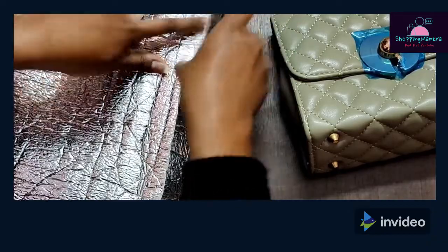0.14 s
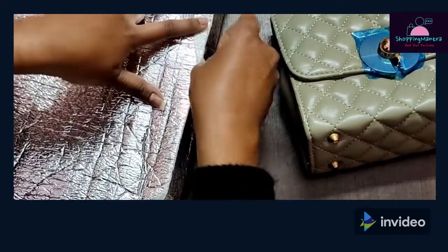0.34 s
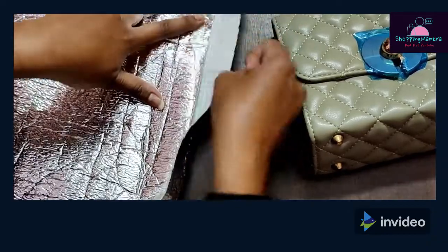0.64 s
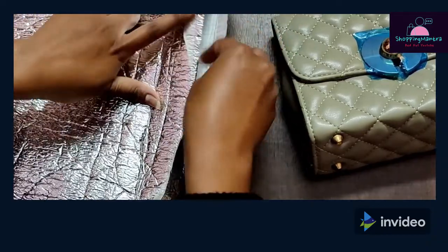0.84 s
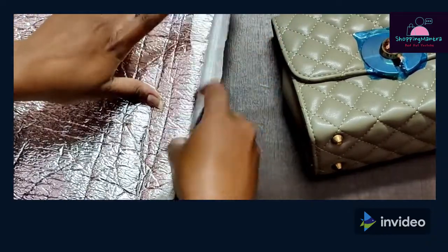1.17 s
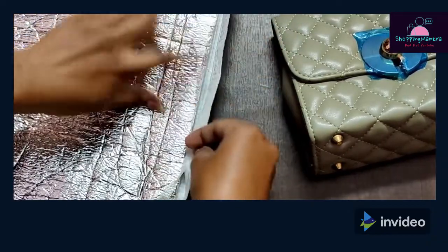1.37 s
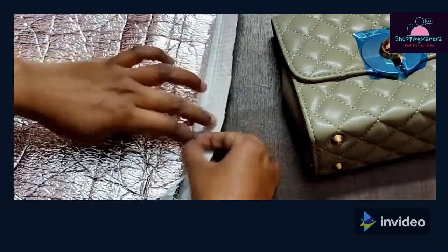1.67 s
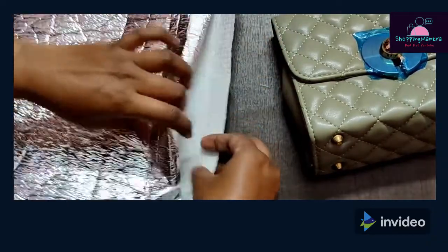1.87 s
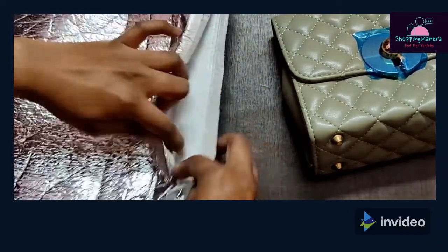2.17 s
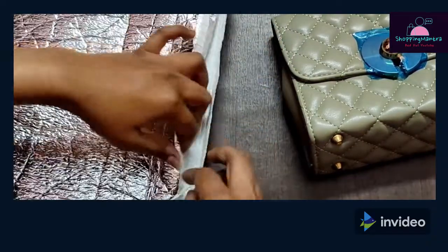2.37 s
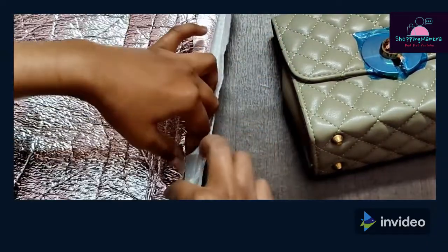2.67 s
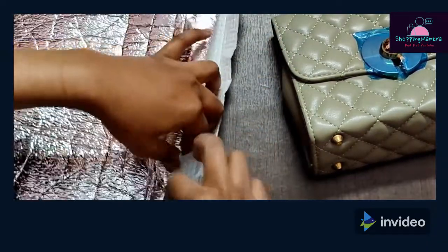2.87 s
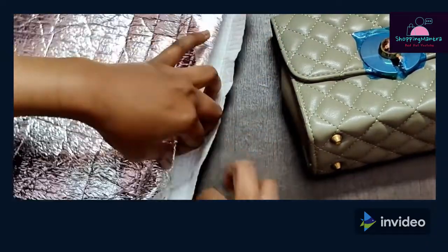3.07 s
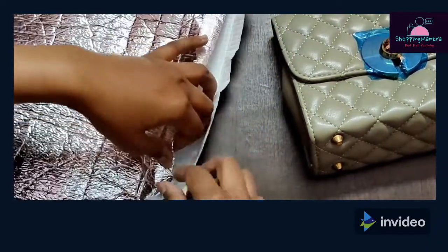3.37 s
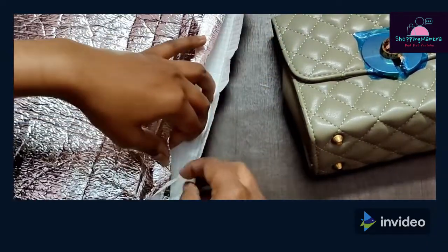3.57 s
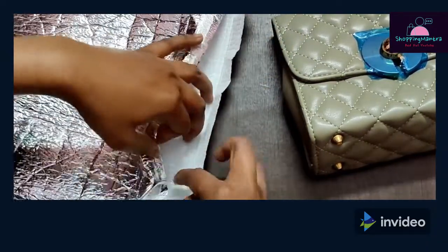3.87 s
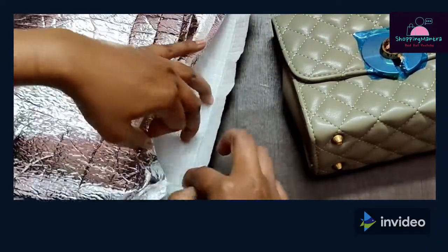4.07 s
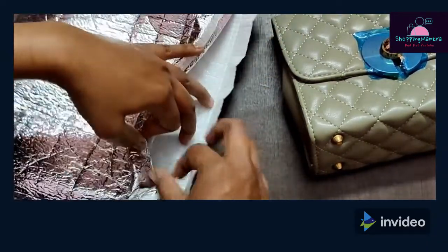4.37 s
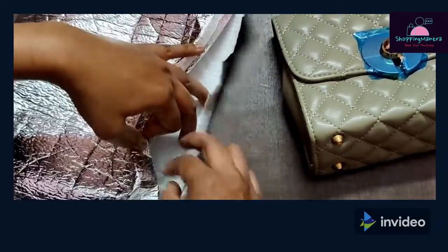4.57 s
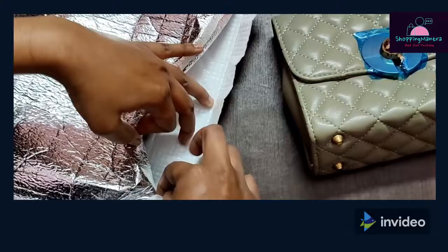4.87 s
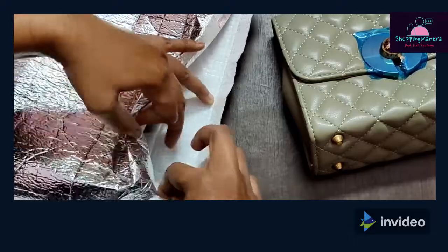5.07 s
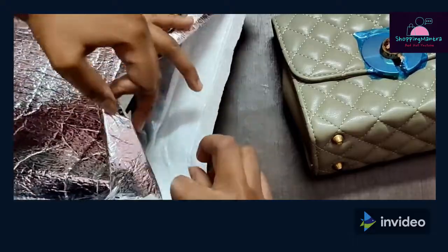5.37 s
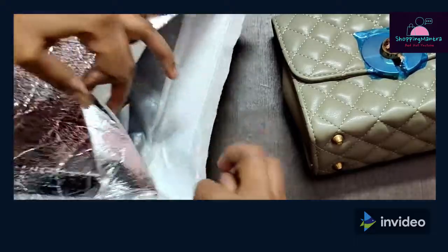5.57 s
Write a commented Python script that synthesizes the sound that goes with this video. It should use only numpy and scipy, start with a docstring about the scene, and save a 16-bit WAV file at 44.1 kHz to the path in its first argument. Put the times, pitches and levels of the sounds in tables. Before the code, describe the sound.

Foil-lined plastic wrapping is opened on a table, heard close and centred with a short indoor reverberation. Crisp opening snaps give way to quiet rustle, then a strong cluster of crackles. Scattered ticks and a low bump come midway; heavier snaps with padded knocks and busier crinkling close it, over faint low rumble.

```python
"""Opening of a foil-lined parcel

Hands pull open a foil-lined plastic parcel on a table in a small room, close to one microphone.
Buckling creases excite short noise bursts and damped modes of the foil, the plastic and the padding.
Between the snaps, clumped grains of coloured noise over a steady hiss make the film crinkle and slide.
Damped sines add low thumps, knocks and rings; echoes, a diffuse tail and quiet room air surround it all."""
import sys
import numpy as np
from scipy import signal
from scipy.fft import rfft, irfft
from scipy.io import wavfile
from scipy.ndimage import uniform_filter1d

SR = 44100
rng = np.random.default_rng(int(sys.argv[2]) if len(sys.argv) > 2 else 0)


def to_wav(s):
    """Save 16-bit WAV."""
    ch = np.atleast_2d(s).T  # columns
    pcm = np.round(np.clip(ch, -1, 1) * 32767)  # PCM
    wavfile.write(sys.argv[1], SR, pcm.astype(np.int16))


N = 253134  # length in samples

# Creases that stand out; levels are relative energies, as rms over 1 ms:
# [t/s, crack level/dB, crack brightness/dB, pop level/dB, pop f/Hz, thump level/dB]
CREASES = [(.036, -18, -4, -25.5, 1820, -32.5), (0.0388, -12.5, -10, -16.5, 1730, -46),
           (0.044, -20.5, -3, -27, 2030, -41), (0.324, -23, 5, -37, 1860, -61),
           (0.3588, -31, 1, -32.5, 1810, -75), (0.518, -42.5, -10, -55, 1720, -76),
           (0.5457, -51, -14, -46, 1720, -59), (.6734, -18, -16, -16.5, 2054, -35),
           (0.6876, -18, 2, -23, 2060, -38), (0.6971, -15, 3, -12.5, 1820, -28),
           (.7, -18, 8, -11.5, 1750, -36), (0.7039, -18, -1, -15, 2200, -40),
           (.7155, -15.5, 3, -17, 2020, -42.5), (0.721, -21, -5.5, -16, 1824, -42.5),
           (.865, -42, -4, -43, 1460, -56), (.91, -36.5, 8, -56, 2000, -71),
           (1.0544, -41, -18, -35, 1470, -48.5), (1.2496, -35.5, -4, -31, 1570, -60),
           (1.2647, -20.5, 9, -16, 1420, -39), (1.2825, -30, -11, -33, 1900, -30.5),
           (1.2956, -19.5, 8, -24, 1860, -48), (1.4419, -37.5, -10, -47, 1970, -53.5),
           (1.455, -42, 11, -41.5, 1680, -54), (1.518, -36, 5, -40, 1820, -65),
           (1.582, -28.5, 12, -26, 1910, -47), (1.5966, -21, -3, -29, 1740, -42.5),
           (1.8035, -34.5, 4, -40.5, 2930, -61), (1.8531, -23.5, 8, -31.5, 3040, -52),
           (1.8698, -37.5, 0, -37.5, 1650, -48), (1.925, -30, 27, -38, 1980, -47),
           (1.9571, -33, 16, -42, 1500, -44.5), (1.976, -31, 22, -53, 1770, -52),
           (2.0297, -34, -3, -32.5, 1840, -57), (2.3515, -21.5, -17, -24, 2250, -42),
           (2.356, -20, 3.5, -27, 2440, -42), (2.421, -31.5, -9, -31, 1940, -42),
           (2.4744, -36, 11, -50, 1700, -69), (2.6127, -49, -12, -42, 1530, -68),
           (2.9375, -37, 7, -35.5, 1350, -56), (2.958, -34.5, -1, -45, 1710, -65),
           (2.9828, -41, 13, -46, 1390, -65), (2.9977, -29, 1.5, -19, 1740, -36),
           (3.068, -32, -17, -61, 1790, -54), (3.1393, -34, 3.5, -43, 1934, -47),
           (3.6133, -33, 2, -25.5, 2020, -35.5), (3.798, -40, 10, -60, 2000, -66),
           (3.8673, -27, 9, -39, 1690, -61), (3.9322, -22.5, 4.5, -33.5, 2430, -58),
           (3.9839, -37, -2, -40.5, 1890, -58), (4.0219, -35, 7, -34, 1150, -31),
           (4.2433, -18, -10, -20.5, 2050, -21), (4.2672, -16.5, 1.5, -17.5, 1950, -19),
           (4.4542, -49, -17, -43, 1800, -44), (4.6915, -28, -5, -26, 1780, -26),
           (4.845, -69, 5, -46.5, 1700, -44), (4.9993, -54, -1, -51, 1820, -72),
           (5.097, -23.5, -6.5, -17.5, 1740, -18.5), (5.2952, -33.5, 1, -30.5, 2090, -37),
           (5.325, -32.5, 0, -30.5, 1900, -32.5), (5.3568, -26, -11, -28.5, 2730, -29),
           (5.3958, -33.5, -9, -31, 1400, -28), (5.54, -32, -15, -42, 2180, -56),
           (5.589, -42, -8, -41, 1920, -37.5), (5.6431, -29, 1, -30.5, 1780, -27),
           (5.6504, -32, -17, -37.5, 1710, -35), (5.7077, -41, -9, -47, 1560, -49)]
# Low thumps and knocks, short rings of the sheet and one faint lingering ring, one damped mode each:
# [t/s, energy level/dB, f/Hz, decay time/s]
KNOCKS_AND_RINGS = [(0.038, -35.5, 295, 0.0052), (0.361, -49, 1062, .34), (0.699, -16, 1700, 0.0049),
                    (0.713, -29, 202, 0.0065), (1.255, -35, 315, 0.0024), (1.265, -19, 1244, 0.0017),
                    (2.419, -29.5, 310, 0.0042), (2.999, -28, 300, 0.002), (3.132, -29.5, 266, 0.0041),
                    (3.336, -32, 93, 0.0071), (3.352, -25.5, 33.4, 0.028), (3.614, -34.5, 276, 0.00294),
                    (3.807, -37, 159, 0.0026), (4.019, -25.5, 330, 0.0025), (4.243, -20, 357, 0.0014),
                    (4.692, -30, 338, 0.0026), (5.098, -23.5, 927, 0.018), (5.601, -37.5, 65, 0.019)]
# Relative spectra of the three parts of the wrapping: [f/Hz, level per Hz/dB]
FOIL_SPECTRUM = [(700, -30), (2000, -7), (2900, -16.5), (3900, -11.5), (5000, -2.5), (6500, 5), (7600, 1.5),
                 (8500, -4), (10000, -2), (12000, -4), (13700, -0.5), (15500, -8.5), (17000, -9)]
PLASTIC_SPECTRUM = [(300, -55), (700, -8), (1100, 0.5), (1600, 1), (2300, -2.5), (3300, -8.5),
                    (5000, -14.5), (9000, -53)]
PADDING_SPECTRUM = [(100, -33.5), (190, -3.5), (280, 5.5), (500, -5), (800, -0.5), (1300, -6),
                    (3000, -51.5)]
# Pulls and slides of the fingers, with relative levels:
# [start t/s, length t/s, foil crinkle level/dB, plastic flexing level/dB, padding shift level/dB]
FINGER_STROKES = [(-.02, 0.044, -36, -37.5, -51.5), (0.03, 0.047, -39, -54, -66),
                  (0.155, 0.11, -52.5, -52, -63.5), (0.237, 0.16, -54, -54.5, -61.5),
                  (0.623, 0.042, -60.5, -54.5, -75), (0.66, 0.053, -27.5, -27.5, -43.5),
                  (0.787, 0.078, -48.5, -48.5, -62.5), (0.897, .12, -60, -62, -91),
                  (1.024, 0.12, -63.5, -61, -63), (1.2, 0.066, -57, -62, -67),
                  (1.288, .045, -44.5, -50, -50), (1.42, .13, -61, -61, -75),
                  (1.594, 0.018, -39.5, -39.5, -52.5), (1.668, 0.073, -55.5, -58, -72),
                  (1.847, .12, -55.5, -50, -71), (1.987, 0.11, -49.5, -51, -61),
                  (2.134, 0.3, -53, -54, -64), (2.402, 0.084, -54.5, -50, -53),
                  (2.623, 0.076, -67.5, -59.5, -59.5), (2.775, 0.13, -62.5, -62, -91),
                  (3.046, 0.13, -58.5, -54.5, -64), (3.28, 0.037, -80, -67, -79.5),
                  (3.68, .18, -64, -64.5, -69), (3.88, 0.13, -58, -58.5, -58.5),
                  (4.02, 0.22, -55.5, -55, -55.5), (4.216, 0.092, -58, -63, -51),
                  (4.432, 0.12, -61, -56, -53), (4.676, 0.016, -46.5, -49.5, -43),
                  (4.737, 0.034, -70, -58.5, -46), (4.844, 0.086, -64, -59, -63.5),
                  (4.969, 0.11, -63.5, -62, -59.5), (5.1, .075, -79, -70, -44),
                  (5.225, 0.13, -54, -53.5, -51), (5.335, 0.09, -45.5, -47, -39.5),
                  (5.443, 0.32, -57.5, -58.5, -59.5), (5.622, 0.055, -57.5, -58.5, -45.5)]
# Stir under the resting hand: [foil level/dB, plastic level/dB, padding level/dB]
REST_LEVELS = (-77, -80, -76)
# Treble gain, higher where the foil is pulled taut: [t/s, lift level/dB]
FOIL_TENSION = [(0, 8), (.2, -8), (.7, 0), (1.1, -12), (1.3, -6), (1.95, -1.5), (2.25, -2), (2.999, 1),
                (3.65, -5), (4.101, -3), (4.27, 4), (4.6, -8), (4.9, 10.5), (5.1, 5.5), (5.4, 1.5),
                (5.74, 4.5)]
# Reverberation time of the room: [f/Hz, time to fall by 60 dB t/s]
REVERB_TIME = [(150, 0.55), (330, 0.36), (600, 0.32), (1500, 0.27), (4000, 0.36), (9000, 0.23),
               (16000, 0.26)]
# Early reflections off the table and near walls: [delay t/s, gain as a factor]
REFLECTIONS = [(.0052, 0.029), (.0095, 0.063), (0.0158, 0.088), (0.0225, -0.086), (0.031, 0.042)]
# Relative spectrum of the quiet room: [f/Hz, level per Hz/dB]
AIR_SPECTRUM = [(15, 0), (30, -13), (55, 8.5), (104, 1.5), (134, -2.5), (216, -16), (400, -23.5),
                (700, -29), (1700, -27.5), (3200, -34), (6500, -27.5), (8650, -38.5), (13500, -31.5),
                (16000, -38.5)]

AIR_DB = -55.5  # rms level of the room air
BAND_EDGE_HZ = 16150
ATTACK_S, RELEASE_S = 0.012, 0.025  # a stroke takes hold, keeps its level, then dies away
THUMP_HZ, THUMP_SCATTER = 525, 0.17  # pitch of the padded sheet, and its spread between snaps as a share


def amp(db):
    """Level: decibels to an amplitude factor."""
    return 10 ** (np.asarray(db) / 20)


def evened(x):
    """Normalisation: scales to rms 1."""
    return x / np.sqrt(np.mean(x ** 2) + 1e-20)


def one_ms(x):
    """Energy normalisation: scales to the energy of one millisecond at rms 1."""
    return x / np.sqrt(np.sum(x ** 2) * 1000 / SR + 1e-20)


def read(points, hz):
    """Interpolation: reads a table on a log-frequency axis."""
    f, value = np.transpose(points)
    return np.interp(np.log(hz + 1), np.log(f + 1), value)


def add(mix, s, sound):
    """Superposition: mixes a sound in at time s."""
    part = mix[max(round(s * SR), 0):][:len(sound)]
    part += sound[:len(part)]


def colour(x, spectrum, size=2048):
    """Minimum phase: a causal filter with the given spectrum keeps the sharp front of a click."""
    log_gain = np.log(amp(read(spectrum, abs(np.fft.fftfreq(size, 1 / SR)))))
    taps = np.fft.ifft(np.exp(signal.hilbert(log_gain).conj())).real
    return signal.fftconvolve(x, taps[:size // 2])[:len(x)]


def swell(t, decay):
    """Damping: an envelope with a rounded start and an exponential fall."""
    return np.exp(-t / decay) * (1 - np.exp(-1.5 * t / decay)) ** 2


def ring(t, hz, decay):
    """Modal vibration: one damped sine."""
    return swell(t, decay) * np.sin(2 * np.pi * hz * t)


def snaps(creases, crack_s=0.00055, creak_s=0.0018, creak_db=-19, shiver_db=-23, shiver_s=0.0041,
          pop_cycles=0.8, pop_rough=0.83, pop_rough_s=0.0009,
          thump_cycles=0.81, thump_rough=0.75, thump_rough_s=0.0027, thump_db=1.5):
    """Buckling: a crease flips, the foil cracks, the facet beside it pops and the padded sheet thumps."""
    out = np.zeros(N)
    t = np.arange(1280) / SR
    # neighbouring wrinkles shiver on for a few milliseconds
    shiver = amp(shiver_db) * swell(t, shiver_s)
    for s, crack_level, bright_db, pop_level, pop_hz, thump_level in creases:
        thump_hz = THUMP_HZ * np.exp(THUMP_SCATTER * rng.standard_normal())
        crack_noise, pop_noise, thump_noise, creak_noise = rng.standard_normal((4, len(t)))

        # a tighter crease cracks brighter
        tilt = [(7000, 0), (13000, bright_db + 2.5)]
        foil = [(hz, db + read(tilt, hz)) for hz, db in FOIL_SPECTRUM]
        crack = colour(crack_noise * (swell(t, crack_s) + shiver), foil)

        # each ring is one main mode among many irregular ones
        pop_mode = one_ms(ring(t, pop_hz, pop_cycles / pop_hz))
        pop_modes = one_ms(colour(pop_noise * (swell(t, pop_rough_s) + shiver), PLASTIC_SPECTRUM))
        pop = pop_mode + pop_rough * pop_modes
        thump_mode = one_ms(ring(t, thump_hz, thump_cycles / thump_hz))
        thump_modes = one_ms(colour(thump_noise * swell(t, thump_rough_s), PADDING_SPECTRUM))
        thump = thump_mode + thump_rough * thump_modes

        add(out, s, amp(crack_level) * one_ms(crack))
        add(out, s, amp(pop_level) * one_ms(pop))
        add(out, s, -amp(thump_level + thump_db) * one_ms(thump))  # opposite polarity

        # the crease creaks more and more as it is loaded, just before it gives
        strain = (creak_noise * np.exp(-t / creak_s))[:len(t) // 2][::-1]
        creak = amp(crack_level) * one_ms(colour(strain, foil))
        creak += amp(pop_level) * one_ms(colour(strain, PLASTIC_SPECTRUM))
        add(out, s - len(creak) / SR, amp(creak_db) * creak)
    return out


def small_snaps(motion, count=90, above_db=8, spread_db=1.0, ceiling_db=-38,
                bright_db=-3, bright_spread_db=6, pop_hz=1750, pop_spread=0.42):
    """Random buckling: one lesser crease per equal time slot, its level following the motion up to a ceiling."""
    rows = []
    for k, (when, *chance) in enumerate(zip(rng.random(count), *rng.standard_normal((5, count)))):
        at = int((k + when) * (N - 1) / count)
        levels = 20 * np.log10(motion[:, at]) + above_db + spread_db * np.array(chance[:3])
        crack, pop, thump = np.minimum(levels, ceiling_db)
        bright = bright_db + bright_spread_db * chance[3]
        rows.append((at / SR, crack, bright, pop, pop_hz * np.exp(pop_spread * chance[4]), thump))
    return rows


def handling():
    """Power addition: strokes of equal attack and release set the amplitude of foil, plastic and padding."""
    t = np.arange(N) / SR
    power = np.outer(amp(REST_LEVELS) ** 2, np.ones(N))
    for start, length, *levels in FINGER_STROKES:
        attack = np.clip((t - start) / ATTACK_S, 0, 1)
        release = np.exp(-np.clip(t - start - length, 0, 1) / RELEASE_S)
        power += np.outer(amp(levels) ** 2, (attack * release) ** 2)
    return np.sqrt(power)


def crinkle(motion, per_s=520, clump_db=4, spread_db=5, tick_s=0.0012, flex_s=0.00087, shift_s=0.0027,
            padding_db=-2.5):
    """Stick and slip: wrinkles give way in clumps over the hiss of sliding film, exciting all three parts."""
    t = np.arange(N) / SR
    slide = .36  # smooth sliding is weaker than the ticks
    # one wrinkle sets off its neighbours, so the rate comes and goes
    clumps = amp(clump_db * evened(uniform_filter1d(rng.standard_normal(N), size=600)))
    sizes = amp(spread_db * np.minimum(rng.exponential(1, N), 3))
    ticks = sizes * (rng.random(N) < clumps * per_s / SR)
    parts = ((FOIL_SPECTRUM, tick_s, 0), (PLASTIC_SPECTRUM, flex_s, 0), (PADDING_SPECTRUM, shift_s, padding_db))
    out = np.zeros(N)
    for level, (spectrum, decay, db) in zip(motion, parts):
        share = rng.uniform(0.11, 1, N)  # no two wrinkles shake the parts alike
        power = signal.fftconvolve((ticks * share) ** 2, swell(t[:1024], decay) ** 2)[:N]
        envelope = np.hypot(evened(np.sqrt(abs(power))), slide)
        grains = rng.standard_normal(N) * envelope
        out += level * amp(db) * evened(colour(grains, spectrum))
    return out


def wander(x, patchy_db=3.5):
    """Time-varying resonance: the sheet keeps changing shape, so its resonances come and go."""
    z = signal.stft(x, nperseg=256)[2]
    patches = uniform_filter1d(rng.standard_normal(z.shape), size=4, axis=0)  # across frequency
    patches = uniform_filter1d(patches, size=12, axis=1)  # across time
    gain = evened(amp(patchy_db * evened(patches)))
    return signal.istft(z * gain, nperseg=256)[1][:N]


def stretch(x, edge_hz=11500):
    """Tension: a tauter foil lifts the top of its spectrum."""
    highpass = 1 / (1 + (edge_hz / (np.fft.rfftfreq(N, 1 / SR) + 1)) ** 12)
    top = irfft(rfft(x) * highpass, N)
    lift = amp(np.interp(np.arange(N) / SR, *np.transpose(FOIL_TENSION)))
    return x + top * (lift - 1)


def knocks_and_rings(wet_db=-1):
    """Modal response: each thump, knock or ring is one damped mode, with the room's answer added."""
    out = np.zeros(N)
    t = np.arange(SR) / SR
    for s, db, hz, decay in KNOCKS_AND_RINGS:
        add(out, s, amp(db) * one_ms(ring(t, hz, decay)))
    return out + amp(wet_db) * room([out])


def room(sides, wet_db=-9.0, build_s=0.0086, treble_db=-1):
    """Reverberation: early echoes, and a diffuse tail of its own for each side, fading by frequency."""
    wet = np.zeros(N)
    for x in sides:
        hz, t, z = signal.stft(rng.standard_normal(SR // 2), SR, nperseg=256)
        z = z * amp(-60 * t / read(REVERB_TIME, hz)[:, None])
        tilt = amp(read([(2500, 0.0086), (6000, treble_db)], hz))
        tail = signal.istft(z * tilt[:, None], SR, nperseg=256)[1]
        tail *= 1 - np.exp(-(np.arange(len(tail)) / SR / build_s) ** 2)  # gradual build-up
        tail = amp(wet_db) * tail / np.linalg.norm(tail)
        wet += signal.fftconvolve(x, tail)[:N] / np.sqrt(len(sides))
    for k, (delay, gain) in enumerate(REFLECTIONS):
        add(wet, delay, gain * sides[k % len(sides)])
    return wet


def air():
    """Stationary noise: low rumble and faint hiss of the room."""
    hz = np.fft.rfftfreq(N, 1 / SR)
    noise = irfft(rfft(rng.standard_normal(N)) * amp(read(AIR_SPECTRUM, hz)), N)
    return amp(AIR_DB) * evened(noise)


def scene(count=3):
    """Directivity: the sheet sends each side its own waveform; one faces the microphone, feeding both channels."""
    motion = handling()
    rustle = wander(crinkle(motion))
    creases = list(CREASES) + small_snaps(motion)
    sides = [snaps(creases) + rustle for _ in range(count)]
    wrapping = stretch(sides[0] + room(sides))
    mono = wrapping + knocks_and_rings() + air()
    return np.array([mono, mono])


def record(dry):
    """Band limitation: the recorder's low-pass filter."""
    taps = signal.firwin(255, BAND_EDGE_HZ, window=("kaiser", 8), fs=SR)
    return signal.oaconvolve(dry, taps[None], "same")


dry = scene()
out = record(dry)
to_wav(out)
```